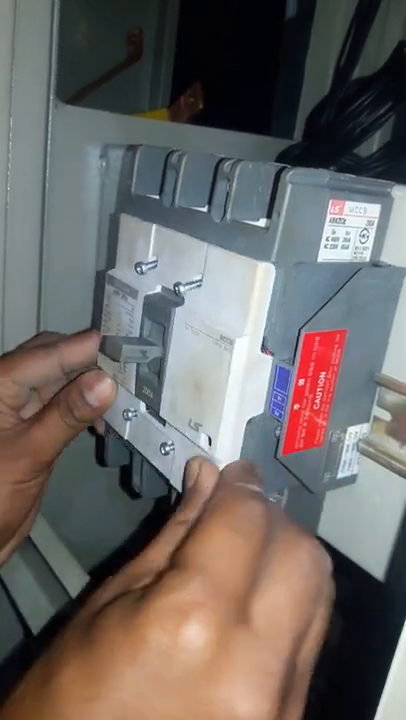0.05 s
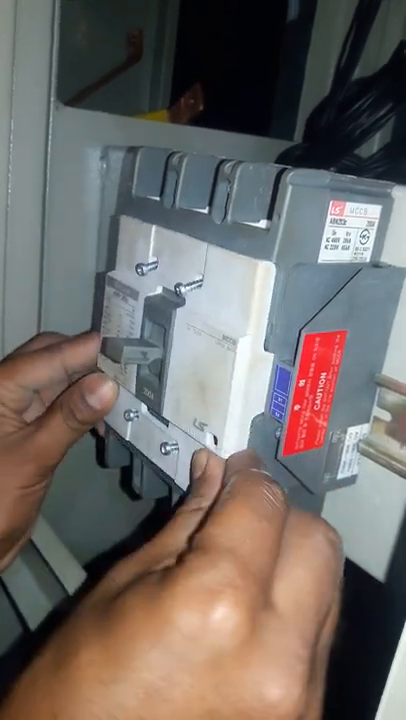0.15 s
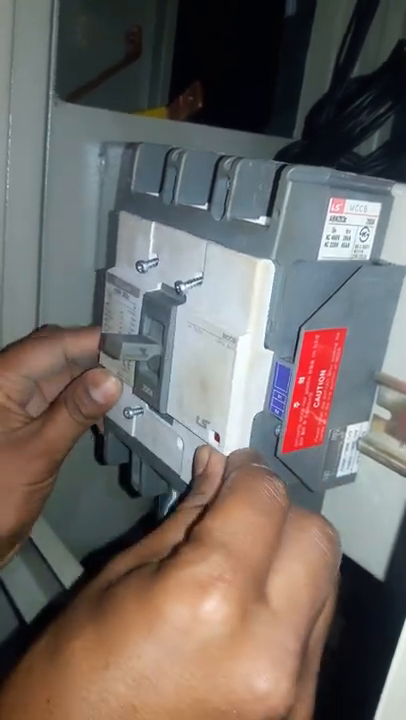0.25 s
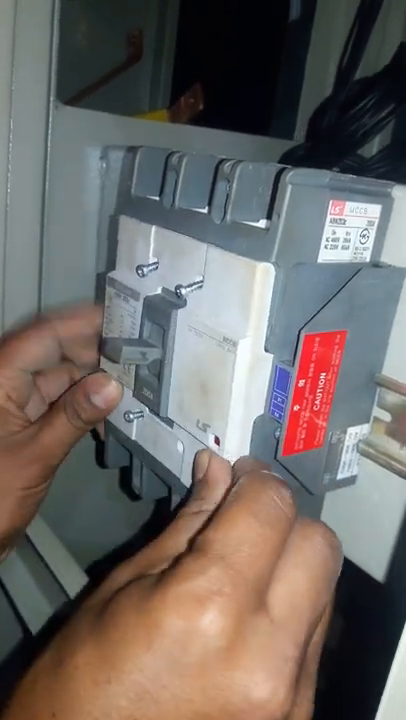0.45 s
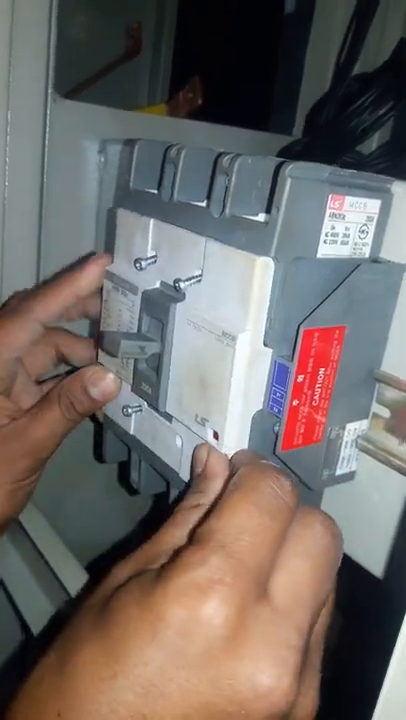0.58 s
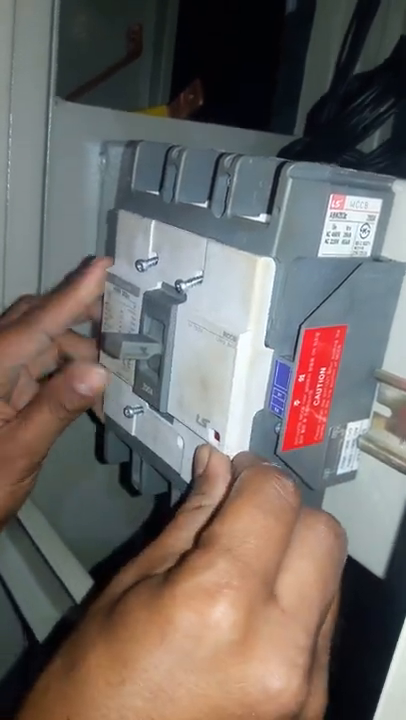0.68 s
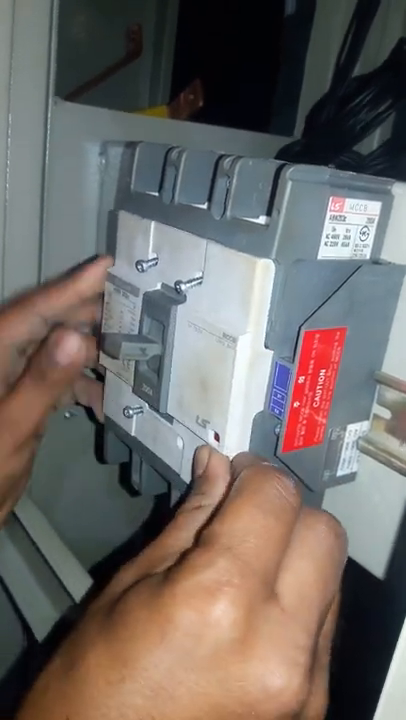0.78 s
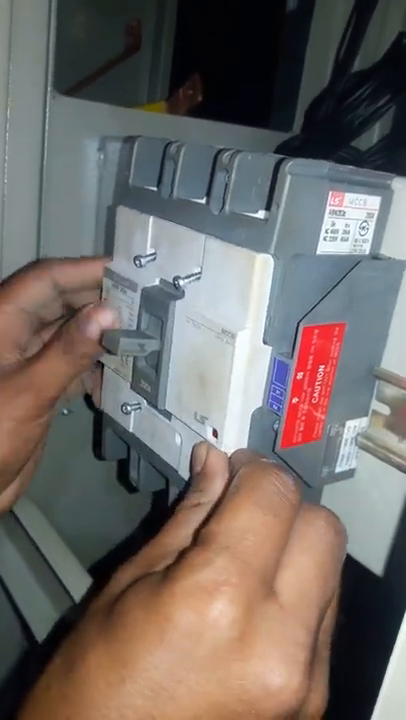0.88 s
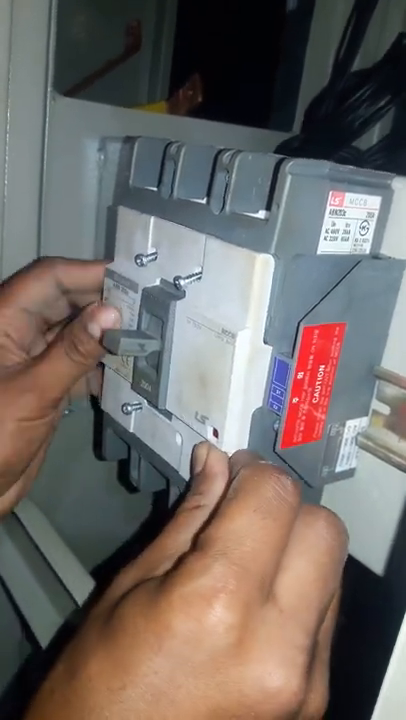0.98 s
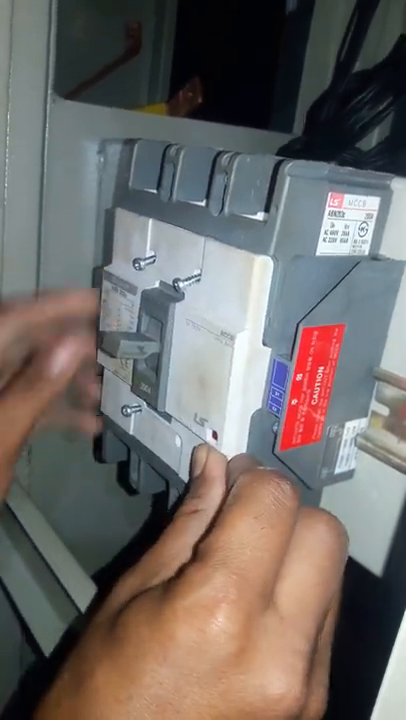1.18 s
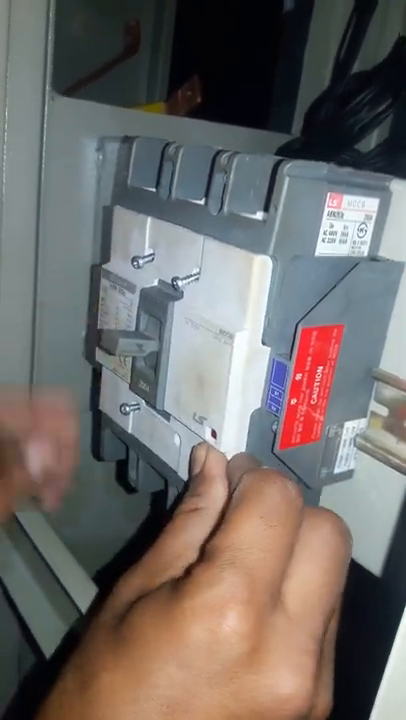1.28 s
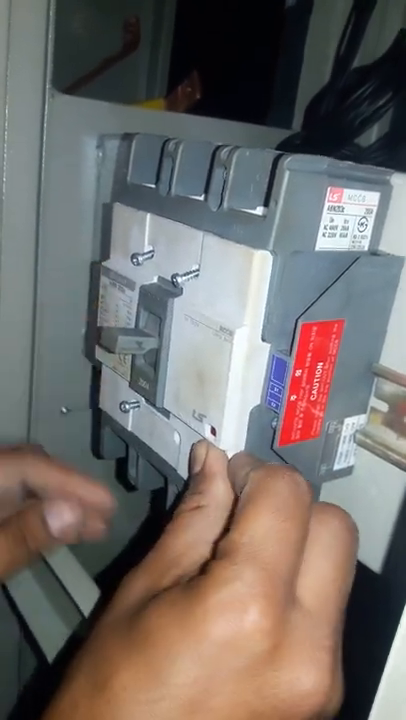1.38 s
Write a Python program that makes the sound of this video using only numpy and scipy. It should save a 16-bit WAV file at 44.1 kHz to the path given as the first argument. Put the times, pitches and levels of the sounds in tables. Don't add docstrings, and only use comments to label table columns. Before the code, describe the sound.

A circuit breaker is handled close to a phone microphone in a small hard room: hollow plastic cover knocks, a sharp burst of loose steel screw and latch clicks, a brief lull, then a softer rattle.

```python
import sys
import numpy as np
from scipy import signal
from scipy.fft import rfft, irfft, next_fast_len
from scipy.io import wavfile
from scipy.ndimage import uniform_filter1d, map_coordinates

SR = 44100
rng = np.random.default_rng(int(sys.argv[2]) if len(sys.argv) > 2 else 0)


def gain_from_db(level_db):
    decades = np.asarray(level_db, float) / 20
    return 10 ** decades


def to_wav(s):
    ch = np.atleast_2d(s).T
    pcm = np.round(np.clip(ch, -1, 1) * 32767)
    wavfile.write(sys.argv[1], SR, pcm.astype(np.int16))


N = 63945

# start_s, peak_db, case_over_peak_db, chatter_t60_s, part_hz
FIRST_FLURRY = [(.4225, -15, -24, .05, 6000), (.427, -6.5, -36, 0.0025, 5000),
                (.428, -4.5, -37.5, 0.0061, 6250), (.4299, -4.5, -34, 0.0045, 6200),
                (.4315, -20.5, -12.5, 0.0081, 5650), (.4335, -12, -5, 0.0034, 6200),
                (.4365, -15.5, -15.5, 0.014, 6250), (.439, -22.5, -21, .025, 6190),
                (.45, -13, -1.5, 0.018, 4640), (.505, -12, -29, 0.025, 6910),
                (.5065, -8.5, -28, .005, 6900), (.5142, -8.5, -38, 0.0052, 5650),
                (.5158, -8, -25, 0.0064, 5650), (.5208, -9, -21, 0.0016, 6800),
                (.523, -17.5, -2.5, 0.014, 5670), (.528, -21, -8, .005, 5100),
                (.535, -30.5, 6, 0.024, 5300), (.5537, -11.5, -26, 0.0048, 5500),
                (.555, -10, -8, .01, 5500), (.5605, -13, -13, 0.0033, 6250),
                (.563, -13.5, -22, 0.018, 4850), (.5775, -14.5, -19, .015, 5670),
                (.583, -13, -10, 0.0043, 6220), (.585, -21.5, -21, 0.0049, 6220),
                (.59, -30.5, 3.5, 0.017, 6140), (.737, -37, 2.5, 0.14, 5670)]
# start_s, peak_db, case_over_peak_db, chatter_t60_s, part_hz
SECOND_FLURRY = [(.910, -44.5, 10, 0.092, 5850), (0.915, -43.5, 6.5, .026, 5680),
                 (.948, -54, 15.5, 0.016, 4560), (.992, -27, -4.5, 0.0096, 5380),
                 (0.9945, -28, -11, 0.025, 6240), (1.058, -27.5, -37, .003, 5700),
                 (1.0598, -17, -12, 0.0084, 5580), (1.063, -22, -8.5, 0.016, 6250),
                 (1.114, -39.5, 5.5, .016, 5950), (1.1324, -25.5, -7.5, 0.018, 6860),
                 (1.1387, -22, -15.5, 0.042, 5630), (1.147, -25.5, -2.5, 0.053, 5980),
                 (1.1575, -30, -27, 0.012, 5430), (1.1608, -17.5, -14, 0.0036, 5970),
                 (1.164, -21, -6, 0.009, 6500), (1.168, -30, -10, 0.023, 6500),
                 (1.175, -17, -18.5, 0.01, 6670), (1.179, -25, -5, 0.011, 6550),
                 (1.188, -36, -1, .01, 5750), (1.2, -29.5, -9.5, 0.02, 6370),
                 (1.21, -40.5, 8.5, 0.02, 6570), (1.228, -53, 6, 0.015, 5200)]
# mode_hz, level_db, t60_s
STEEL_MODES = [(3600, -30, 0.22), (4102, -10.5, 0.23), (4266, -22, 0.22), (4464, -6, 0.15),
               (4770, -8, 0.12), (4810, -10.5, .1), (5190, -1, 0.047), (5650, 7.5, 0.037),
               (6010, -5.5, 0.024), (6000, -8, 0.027), (6220, 3, 0.056), (6500, -2, 0.056),
               (6640, -6, 0.044), (6570, -19, .05)]
# mode_hz, level_db
STEEL_TOP_MODES = [(8500, 0), (9800, 2), (11000, 6), (11900, -4.5), (13000, -9), (14200, 1), (15300, 1.5)]
# mode_hz, level_db, t60_s
CASE_MODES = [(1395, -6, 0.14), (1619, 0, 0.055), (1800, -9.5, 0.21), (1889, -8.5, 0.14),
              (2443, -9.5, 0.038), (2877, -1.5, 0.076), (3025, -11.5, 0.12), (3088, -9, 0.14),
              (3340, -18.5, 0.11), (3790, -5, 0.064)]
# freq_hz, level_db
BUZZ_COLOUR = [(900, -35.5), (1350, -1), (1900, -10), (2300, -4.5), (3100, -1), (4300, -9.5), (5500, -31.5)]
# freq_hz, level_db
CRACK_COLOUR = [(1000, -23.5), (1900, -5), (2400, -19.5), (3200, -9.5), (4200, -19), (6100, -3),
                (7800, -17.5), (15800, -25.5)]
# start_s, pitch_hz, peak_db, t60_s
PART_PINGS = [(.428, 3233, -26.5, 0.17), (.444, 1395, -24.5, 0.12), (.462, 1395, -35.5, 0.29),
              (.519, 2966, -27.5, 0.088), (.997, 3020, -40.5, 0.029), (1.064, 2920, -54, 0.016),
              (.531, 1404, -30.5, 0.082), (.556, 5560, -35, 0.12), (1.158, 5190, -30, 0.045),
              (1.171, 5215, -29.5, 0.08), (1.236, 5200, -65, 0.14), (1.21, 1800, -44.5, 0.13)]
# start_s, pitch_hz, peak_db, t60_s
DRY_TICKS = [
    (.0945, 6250, -63, 0.0073),
    (.1075, 1470, -42, 0.01),
    (.1075, 5130, -62, .008),
    (0.107, 3430, -56, 0.0065),
    (0.4274, 6077, -8, 0.011),
    (0.3181, 1460, -17, 0.035),
    (.3268, 6150, -26, .01),
]
# start_s, peak_db, snap_over_peak_db, thud_over_peak_db, spot_index
COVER_KNOCKS = [
    (.2035, -8.5, -26, -15.5, 0),
    (.318, -4, -13, -5.5, 1),
    (.327, -10, -17.5, -12.5, 1),
    (.348, -32.5, -19, 5.5, 1),
    (.368, -37, -40.5, 15, 1),
]
# mode_hz, level_db, t60_s
SHELL_MODES = [
    [(237, -6, 0.067), (672.4, -5, 0.12), (736, 2.5, 0.043), (1018, -8, 0.085), (1104, -20, 0.051),
     (1526, -4, 0.043), (2800, -9, 0.017), (4190, -17, 0.019), (5950, -15, 0.013)],
    [(261.5, -12, 0.11), (554, -22, 0.15), (593, 0, 0.051), (682, -4, 0.0074), (942, 1.5, 0.03),
     (1010, -27, 0.044), (1460, 6, 0.037), (1550, -20.5, 0.016), (2710, -13.5, .05), (3000, -7.5, 0.015),
     (6376, -9, 0.025)],
]
# freq_hz, level_db
THUD_COLOUR = [(88, -37), (150, -12.5), (837, -5.5), (1000, -4.5), (1240, -7.5), (1460, -6.5), (4590, -30),
               (6370, -44.5), (7500, -50), (9750, -78), (16500, -120)]
# start_s, peak_db, pitch_hz
LOW_BUMPS = [(0.134, -46.5, 98), (0.223, -28.5, 195.5), (0.266, -37, 255), (.345, -31.5, 152),
             (0.386, -44, 152.5), (0.409, -34.5, 264), (0.447, -37, 145), (0.467, -37, 269),
             (0.531, -43.5, 117), (0.584, -42.5, 145), (0.641, -41.5, 184), (0.999, -41, 141),
             (1.086, -46.5, 393), (1.122, -40.5, 267), (1.253, -46, 93.5), (1.251, -47.5, 251)]
# freq_hz, density_db_per_hz
AIR_COLOUR = [(15, -53.5), (25, -13), (219, -9.5), (253, -8), (741, -11.5), (1190, -13), (1350, -12.5),
              (2020, -19), (7500, -48.5), (9750, -65), (16500, -120)]
# pitch_hz, level_db_rms, start_s, end_s
FAR_WHINES = [(832, -62, 0.0072, 0.47), (1180, -58.5, 1.02, 1.5), (107.6, -60.5, 0, 0.925),
              (269, -63, 0.32, 1.7), (1504, -74.5, 0.1, 0.69)]
# freq_hz, t60_s
ROOM_DECAY = [(200, 0.98), (1500, 0.69), (4000, 0.7), (6200, 0.36), (14000, 0.5)]
# freq_hz, gain_db
MIC_RESPONSE = [(30, -11.5), (70, 1.5), (300, -2.27), (6800, 1), (7800, -10), (9000, -7.5)]

RING_S = 0.25
T_RING_S = np.arange(int(RING_S * SR)) / SR
PING_QUIVER = 0.34
STEEL_WET_DB, SHELL_WET_DB = -7, -15


def unit(x):
    return x / np.sqrt(np.mean(x ** 2) + 1e-20)


def along(points, hz):
    f, v = np.transpose(points)
    return np.interp(np.log(hz + 1), np.log(f + 1), v)


def filtered(x, response):
    m = next_fast_len(x.shape[-1] + 8192)
    return irfft(rfft(x, m) * response(np.fft.rfftfreq(m, 1 / SR)), m)[..., :x.shape[-1]]


def coloured(hit, spectrum):
    x = filtered(hit, lambda hz: gain_from_db(along(spectrum, hz)))
    return x / np.abs(x).max()


def wobble(rate_hz):
    knots = rng.standard_normal(int(N * rate_hz / SR) + 4)
    return map_coordinates(knots, [np.arange(N) * rate_hz / SR])


def ring(modes, scatter_db, attack_s, quiver):
    t = T_RING_S
    hz, db, t60_s = np.transpose(modes)[..., None]
    level_luck, pitch_luck = rng.standard_normal((2, len(modes), 1))
    knots = rng.standard_normal((2, len(modes), 41))
    knots[..., 0] = 0
    sway = [[np.interp(t * 120, np.arange(41), k) for k in part] for part in knots]
    level_sway, phase_sway = quiver * np.array(sway)
    envelope = gain_from_db(db + scatter_db * level_luck - 60 * t / t60_s) * np.exp(1.03 * level_sway)
    phase = 2 * np.pi * hz * (1 + 0.00386 * pitch_luck) * t + 2.06 * phase_sway
    x = (envelope * np.sin(phase)).sum(0) * (1 - np.exp(-t / attack_s))
    return x / np.abs(x).max()


def ping(hz, t60_s, attack_s):
    return ring([(hz, 0, t60_s)], 0, attack_s, PING_QUIVER)


def chatter(t60_s, spiky):
    n = len(T_RING_S)
    grain = np.exp(spiky * rng.standard_normal(n // 25).repeat(25))
    x = rng.standard_normal(n) * grain * gain_from_db(-60 * T_RING_S / t60_s)
    return x / np.linalg.norm(x)


def add(track, start_s, x):
    part = track[round(start_s * SR):][:len(x)]
    part += x[:len(part)]


def room(x):
    hz, t, z = signal.stft(rng.standard_normal(SR // 2), SR, nperseg=256)
    decay = gain_from_db(-60 * t / along(ROOM_DECAY, hz)[:, None])
    tail = signal.istft(z * decay, SR, nperseg=256)[1]
    delayed = np.pad(x, (260, 0))
    return signal.fftconvolve(delayed, tail / np.linalg.norm(tail))


def steel_contact(peak_db, case_db, t60_s, part_hz, muffled):
    crack = [(300, -52.5)] + [(hz, g - 6 * (hz < 3500)) for hz, g in CRACK_COLOUR]
    wash = [(hz, g + 5.5 * (hz > 7000)) for hz, g in crack]
    top = [(hz, g, 0.05) for hz, g in STEEL_TOP_MODES]
    parts = [(hz, g + 10.5 * np.exp(-((hz - part_hz) / 350) ** 2), d) for hz, g, d in STEEL_MODES]

    hit = chatter(t60_s, spiky=0.4)
    hit[:8] *= 2.95
    steel_ring = gain_from_db(-8.5) * ring(parts, scatter_db=7, attack_s=0.00034, quiver=0.37)
    steel_ring += gain_from_db(-20) * ring(top, scatter_db=7, attack_s=0.00018, quiver=0.37)
    x = signal.fftconvolve(unit(hit) / np.sqrt(len(hit)), steel_ring)
    add(x, 0, gain_from_db(1) * coloured(hit, crack))
    add(x, 0.001, gain_from_db(-7) * coloured(chatter(0.07, spiky=0.36), wash))
    add(x, 0, gain_from_db(case_db - 4.5) * ring(CASE_MODES, scatter_db=4.3, attack_s=0.011, quiver=0.66))
    add(x, 0.003, gain_from_db(case_db - 6.5) * coloured(chatter(0.087, spiky=0.2), BUZZ_COLOUR))
    add(x, 0, gain_from_db(-7.5) * ping(part_hz, t60_s=0.0052, attack_s=0.00042))

    treble_db = 0.37 * (peak_db + 10.5) - 21 * muffled
    x = np.pad(x, (88, 0))
    return filtered(x, lambda hz: gain_from_db(treble_db * np.clip((hz - 7000) / 3000, 0, 1)))


def steel():
    out = np.zeros(N)
    lead_s = 88 / SR
    for start_s, db, case_db, t60_s, part_hz in FIRST_FLURRY + SECOND_FLURRY:
        x = steel_contact(db, case_db, t60_s, part_hz, muffled=0.7 < start_s < 1.03)
        add(out, start_s - lead_s, gain_from_db(db - 2.5) * x)
        add(out, start_s - lead_s, gain_from_db(db - 4.5 + STEEL_WET_DB) * room(x))
    for start_s, hz, db, t60_s in PART_PINGS:
        x = gain_from_db(db) * ping(hz, t60_s, attack_s=0.0018)
        add(out, start_s, x)
        add(out, start_s, gain_from_db(STEEL_WET_DB - 10.5) * room(x))
    for start_s, hz, db, t60_s in DRY_TICKS:
        add(out, start_s, gain_from_db(db) * ping(hz, t60_s, attack_s=0.0006))
    return out


def cover():
    out = np.zeros(N)
    snap_colour = [(300, -49)] + CRACK_COLOUR
    for start_s, db, snap_db, thud_db, spot in COVER_KNOCKS:
        x = -ring(SHELL_MODES[int(spot)], scatter_db=3.6, attack_s=0.0011, quiver=0.26)
        add(x, 0.0006, gain_from_db(snap_db) * coloured(chatter(0.03, spiky=0), snap_colour))
        rise_s = 0.0012 * gain_from_db(-0.43 * (db + 4))
        thud = (1 - np.exp(-T_RING_S / rise_s)) * chatter(0.15, spiky=0.2)
        add(x, 0.0008, gain_from_db(thud_db) * coloured(thud, THUD_COLOUR))
        x = filtered(x, lambda hz: hz ** 2 / (hz ** 2 + 160 ** 2))
        add(out, start_s - 0.0006, gain_from_db(db) * x)
        add(out, start_s, gain_from_db(db + SHELL_WET_DB) * room(x))
    return out


def low_bumps():
    out = np.zeros(N)
    t60_s = 0.076
    for start_s, db, hz in LOW_BUMPS:
        modes = [(hz, 0, t60_s), (1.59 * hz, -10, t60_s)]
        add(out, start_s, gain_from_db(db) * ring(modes, scatter_db=0, attack_s=0.026, quiver=PING_QUIVER))
    return out


def whine(hz, db, start_s, end_s):
    t = np.arange(N) / SR
    level = gain_from_db(db + 2.5 + 1.7 * wobble(14.0))
    fade = np.clip(np.minimum(t - start_s, end_s - t) / 0.0089, 0, 1)
    return level * np.sin(2 * np.pi * hz * t + 0.73 * wobble(30)) * fade


def air():
    z = signal.stft(rng.standard_normal(N), nperseg=512)[2]
    patches = uniform_filter1d(rng.standard_normal(z.shape), 6, 0)
    patches = unit(uniform_filter1d(patches, 10, 1))
    noise = signal.istft(z * gain_from_db(0.47 * patches), nperseg=512)[1][:N]
    bed = unit(filtered(noise, lambda hz: gain_from_db(along(AIR_COLOUR, hz))))
    bed_level = gain_from_db(-52 + 1.7 * wobble(3.4))
    whines = sum(whine(*row) for row in FAR_WHINES)
    hiss_band = lambda hz: (hz > 7000) * (hz < 15500) * (hz / 12000) ** 0.6
    hiss = unit(filtered(rng.standard_normal(N), hiss_band))
    return bed_level * bed + whines + gain_from_db(-77) * hiss


def scene():
    return (steel() + cover() + low_bumps() + air())[None]


def top_cut(x):
    return signal.sosfilt(signal.butter(12, 16690, fs=SR, output="sos"), x)


def record(dry):
    edge = lambda hz: np.clip((16150 - hz) / 300, 0, 1) ** 2
    mix = filtered(dry, lambda hz: gain_from_db(along(MIC_RESPONSE, hz)) * edge(hz))
    return top_cut(mix)


dry = scene()
out = record(dry)
to_wav(out)
```